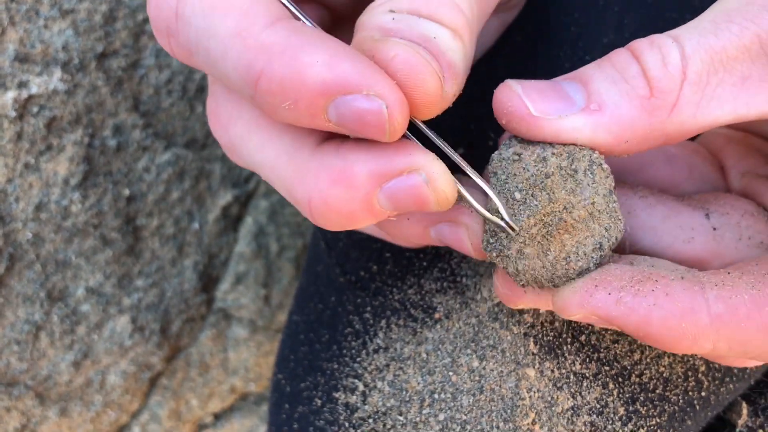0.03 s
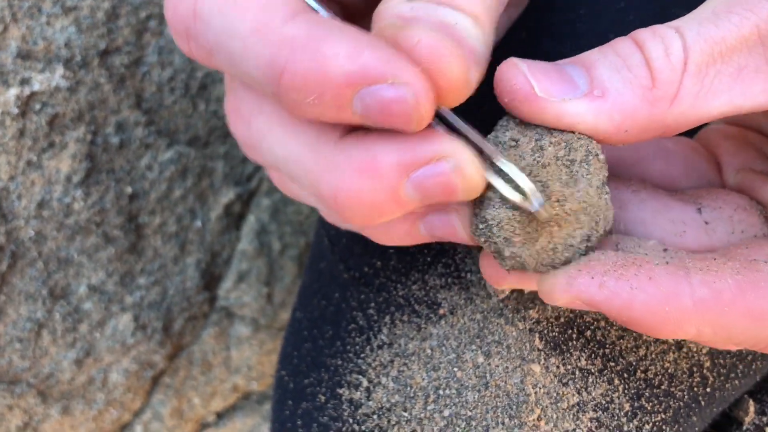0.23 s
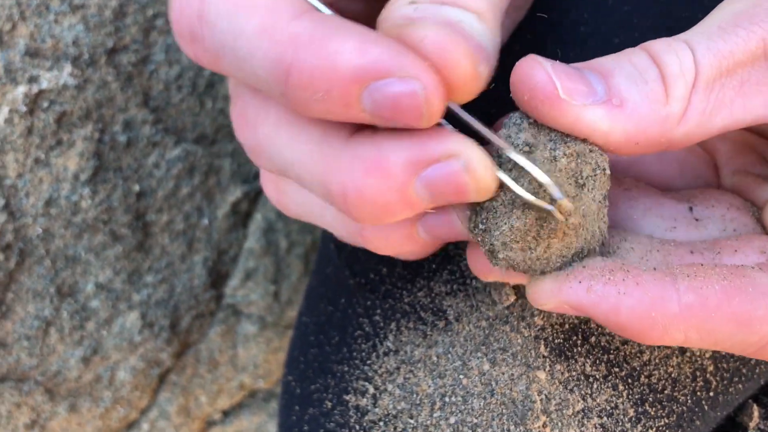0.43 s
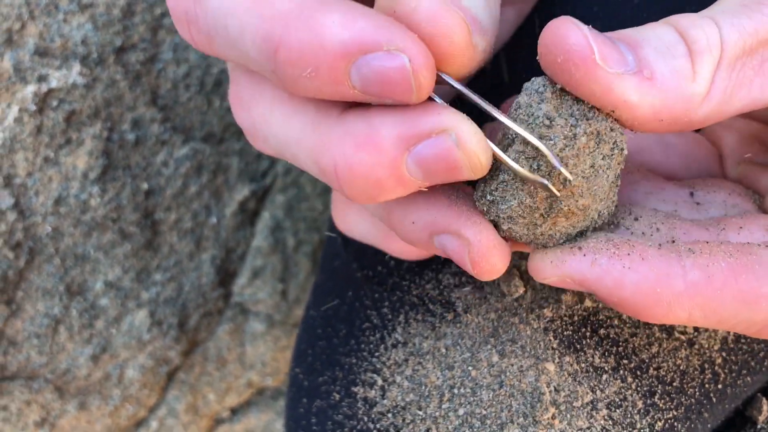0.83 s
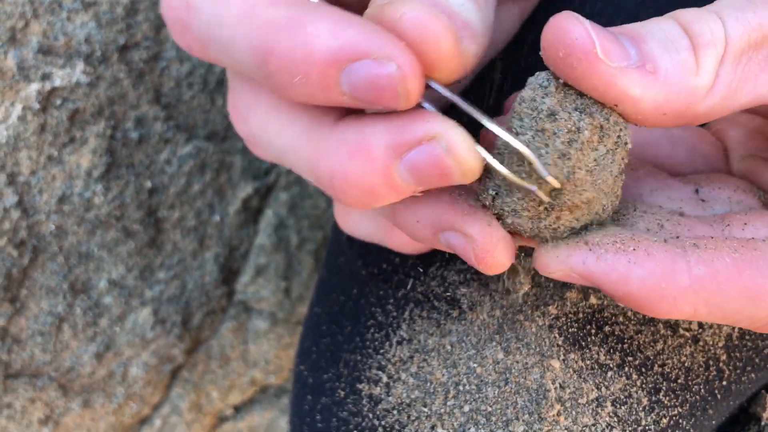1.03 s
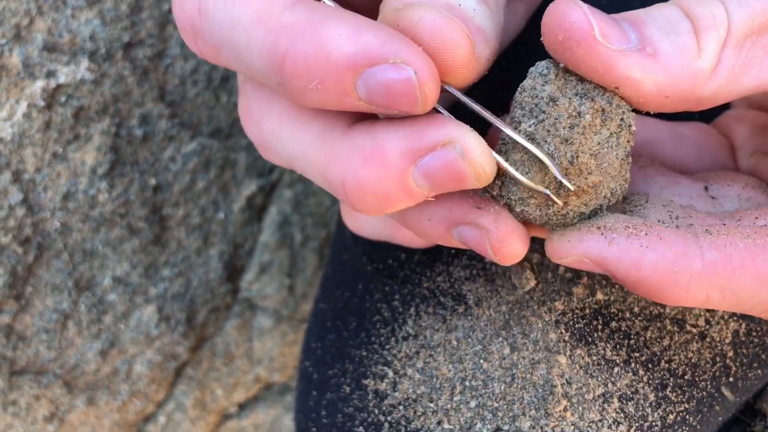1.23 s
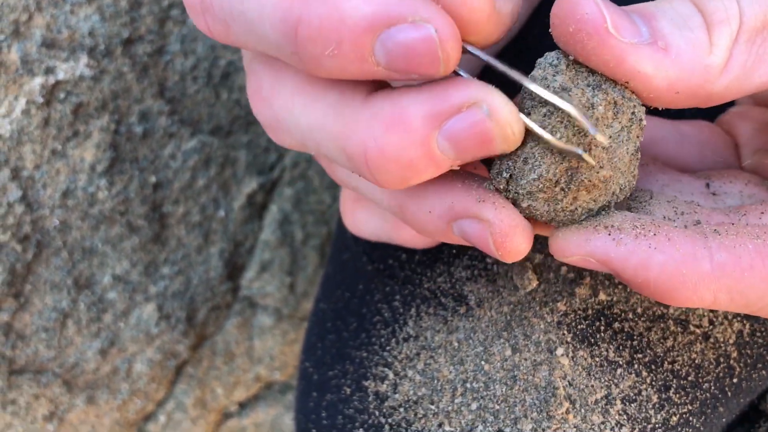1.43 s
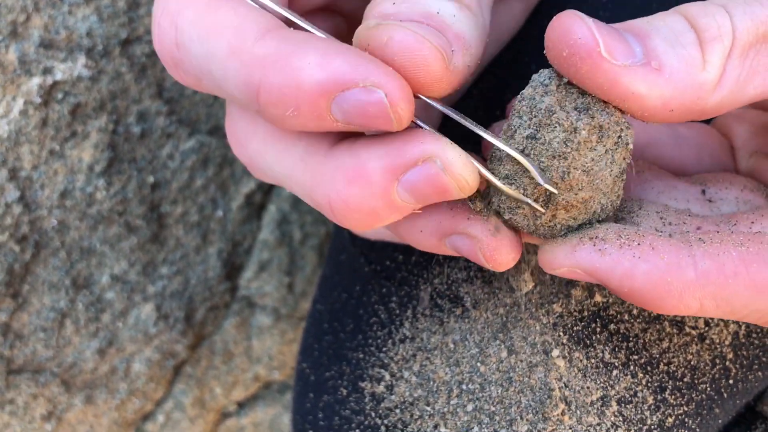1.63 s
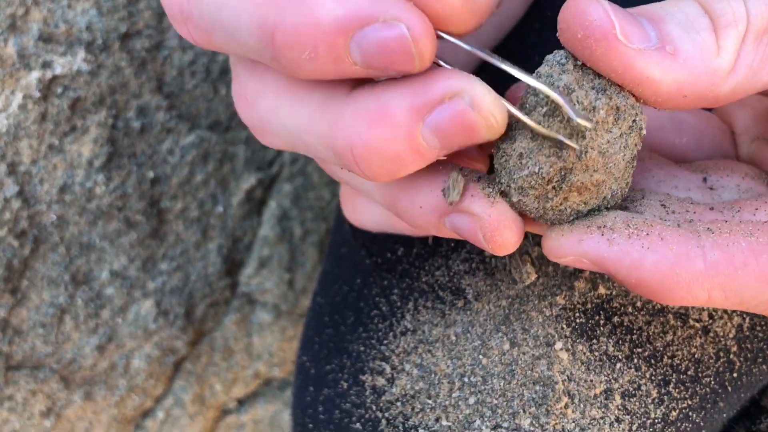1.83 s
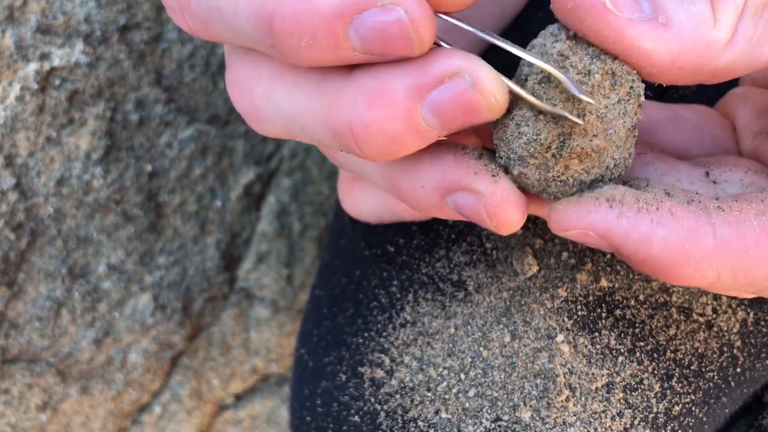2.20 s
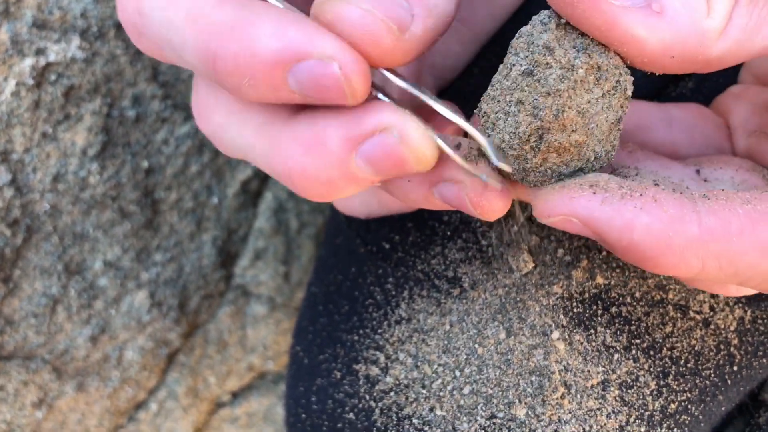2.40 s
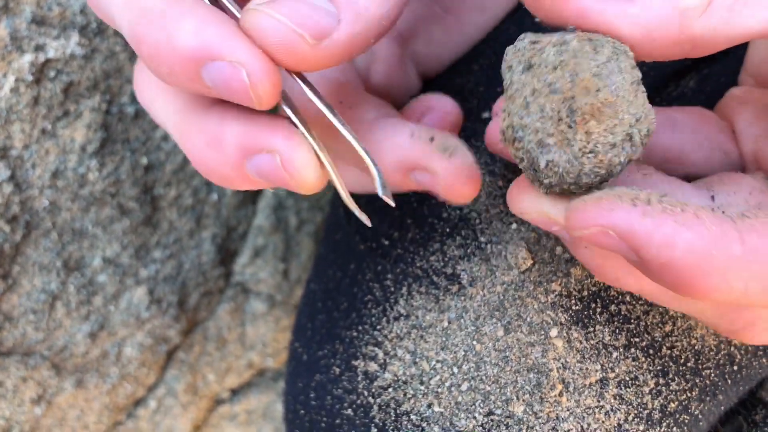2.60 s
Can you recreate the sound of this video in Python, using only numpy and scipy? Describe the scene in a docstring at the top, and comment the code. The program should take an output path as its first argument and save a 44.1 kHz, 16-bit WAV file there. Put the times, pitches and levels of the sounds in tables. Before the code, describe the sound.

Close, dry scraping of metal tweezers picking at a gritty clod outdoors. Brief crumbly strokes come irregularly, mixed with sharp little ticks of grit and a couple of light tip clicks, while low, gentle wind gusts hit the microphone.

```python
"""Steel tweezers scratch and pick at a small lump of gritty sediment, outdoors, close to the microphone.
Each short stroke crushes a run of sand grains that ring faintly in the tweezers; single grains snap off.
The tips jab the lump once and click once, and loose sand shifts between the fingers.
A light, gusty wind rumbles and buffets the microphone over a faint, distant hiss."""
import sys
import numpy as np
from scipy import signal
from scipy.fft import rfft, irfft, next_fast_len
from scipy.io import wavfile

SR = 44100
rng = np.random.default_rng(int(sys.argv[2]) if len(sys.argv) > 2 else 0)


def store_wav(level_fs):
    """Save 16-bit WAV to argv[1]."""
    pcm = np.round(np.clip(np.atleast_2d(level_fs), -1, 1) * 32767)
    wavfile.write(sys.argv[1], SR, pcm.T.astype(np.int16))


N = 121275

# eddies passing over the microphone: t/s, relative level/dB, f/Hz
WIND_EDDIES = [(.008, -39.5, 78), (0.216, -34.5, 212), (0.232, -30, 112), (0.29, -34.5, 252),
               (0.3, -25.5, 113), (.348, -39, 274), (0.383, -32.5, 290), (0.393, -25, 135),
               (0.407, -25.5, 343), (0.416, -43, 87), (.462, -40, 117), (.484, -36, 286),
               (0.506, -19.5, 243), (0.512, -18, 92), (0.53, -51, 250), (0.536, -26.5, 76),
               (.547, -29.5, 226), (0.555, -21, 90), (0.557, -38, 320), (0.573, -42, 326),
               (.601, -43, 75.4), (0.641, -36.5, 290), (0.65, -20, 90), (0.681, -33.5, 180),
               (0.704, -31.5, 214), (0.72, -31, 64.4), (0.777, -31, 80), (0.815, -30.5, 81),
               (0.862, -30, 131), (0.904, -31.5, 283), (0.926, -21, 86), (0.978, -34, 300),
               (1.008, -35, 72), (1.154, -36, 250), (1.177, -33.5, 290), (1.185, -27, 102),
               (1.208, -35.5, 199), (1.242, -35, 80.5), (1.283, -34.5, 77), (1.34, -32.5, 106.5),
               (1.543, -38.5, 181), (1.696, -30, 204), (1.715, -26, 97), (1.765, -36.5, 243),
               (1.79, -32, 161), (1.844, -34, 323), (1.855, -32.5, 113), (1.924, -27, 372),
               (1.931, -27, 84.5), (1.969, -35, 312), (1.976, -24.5, 152), (2.012, -31, 270),
               (2.019, -21, 125), (2.044, -33.5, 161), (2.076, -31.5, 119), (2.109, -31, 236),
               (2.129, -23, 82.5), (2.149, -36.5, 275), (2.172, -29, 320), (2.181, -26.5, 436),
               (2.194, -25.5, 73), (2.209, -28, 66), (2.265, -30.5, 318), (2.27, -30, 82),
               (2.3, -35.5, 327), (2.309, -34.5, 338), (2.323, -22.5, 76), (2.372, -28.5, 194),
               (2.385, -31, 67), (2.393, -37.5, 306), (2.475, -31, 240), (2.484, -26.5, 288),
               (2.511, -28, 147), (2.57, -36, 233), (2.588, -28.5, 107), (2.706, -32, 171)]
# spectrum of crushed grit: f/Hz, relative level/dB
GRIT_SPECTRUM = [(500, -3), (1100, 10.5), (1700, 6), (2600, 3), (4000, 4.5), (6200, 4), (7800, 0),
                 (9200, 1), (10500, -5), (11700, 2.5), (15500, 2)]


def from_db(db):
    """Decibels to gain."""
    return 10 ** (np.asarray(db) / 20)


def rms_one(x):
    """Scale to unit rms."""
    return x / np.sqrt(np.mean(x ** 2) + 1e-20)


def seconds():
    """Time of every sample."""
    return np.arange(N) / SR


def colour(x, spectrum):
    """Minimum-phase filter with the given spectrum and unit gain for white noise."""
    size = 2 * next_fast_len(N)
    bin_hz = np.maximum(np.arange(size // 2 + 1) * SR / size, 1)
    hz, db = np.transpose(spectrum)
    gain = rms_one(from_db(np.interp(np.log(bin_hz), np.log(hz), db)))
    cepstrum = irfft(np.log(gain))[:size // 2]
    response = np.exp(2 * rfft(cepstrum, size) - cepstrum[0])
    return irfft(rfft(x, size) * response)[:N]


def drift(hz):
    """Smooth random wander with unit rms."""
    r = np.exp(-2 * np.pi * hz / SR)
    return rms_one(signal.lfilter([1], [1, -2 * r, r * r], rng.standard_normal(N + SR))[SR:])


def ring(x, hz, t60):
    """One decaying mode, driven by x."""
    r, w = np.exp(-np.log(1000) / (t60 * SR)), 2 * np.pi * hz / SR
    return signal.lfilter([0, np.sin(w)], [1, -2 * r * np.cos(w), r * r], x + 1e-18)


def distant_air(level_db=-66.5):
    """The faint, steady hiss of the open air, far from the microphone."""
    # spectrum of the hiss: f/Hz, relative level/dB
    air_spectrum = [(100, 18.5), (400, 9), (2000, -1.5), (4000, -6), (15500, -12.5)]
    return from_db(level_db) * colour(rng.standard_normal(N), air_spectrum)


def wind_rumble(flutter_db=5, flutter_hz=13.3):
    """Moving air at the microphone, following the gusts with a quick random flutter."""
    # wind strength between buffets: t/s, level/dB
    gusts = [(0, -47), (.13, -60), (.23, -39.5), (.46, -38.5), (0.519, -24), (.61, -34), (1.33, -44.5),
             (1.42, -56.5), (1.65, -45), (1.708, -37), (2.3, -33.5), (2.66, -44.5)]
    # spectrum of wind on the microphone: f/Hz, relative level/dB
    rumble_spectrum = [(22, -30.5), (40, 6), (62, 7), (120, -2.5), (200, -13.5), (400, -35.5), (800, -65.5)]
    gust_db = np.interp(seconds(), *np.transpose(gusts)) + flutter_db * drift(flutter_hz)
    return from_db(gust_db) * colour(rng.standard_normal(N), rumble_spectrum)


def eddy_wakes(gain_db=-17.5, half_length_s=.022):
    """Each eddy breaks up at the microphone into a short flurry of smaller swirls."""
    # spectrum of the rough air in a wake: f/Hz, relative level/dB
    wake_spectrum = [(50, -14), (170, 6.5), (450, -12), (1000, -48)]
    t, power = seconds(), np.zeros(N)
    for s, db, _ in WIND_EDDIES:
        near = np.abs(t - s) < half_length_s
        swell = np.cos(np.pi / 2 * (t[near] - s) / half_length_s)
        power[near] += (from_db(db + gain_db) * swell) ** 2
    return np.sqrt(power) * colour(rng.standard_normal(N), wake_spectrum)


def eddy_buffets(gain_db=3, slowing=.4, width_cycles=.62):
    """Each eddy buffets the microphone with one pressure swing, quick at first and slower at its end; small
    ones swing quicker."""
    t, out = seconds(), np.zeros(N)
    for s, db, hz in WIND_EDDIES:
        near = np.abs(t - s) * hz < 5
        cycles = (t[near] - s) * hz
        swing = cycles - slowing * np.log(np.cosh(cycles))
        envelope = from_db(db + gain_db) / np.cosh(cycles / width_cycles) ** 3
        out[near] -= envelope * np.sin(2 * np.pi * swing)
    return out


def wind(low_cut_hz=39):
    """Wind on the microphone: rumble and wakes with the deepest bass cut, plus the buffets."""
    low_cut = signal.butter(4, low_cut_hz, "high", fs=SR, output="sos")
    return signal.sosfilt(low_cut, wind_rumble() + eddy_wakes()) + eddy_buffets()


def uneven_hiss(wander_db=2, wander_hz=90):
    """White noise whose colour shifts from grain to grain."""
    edges_hz = (0, 2600, 5500, 10500, SR)
    white, hz = rfft(rng.standard_normal(N)), np.fft.rfftfreq(N, 1 / SR)
    bands = [irfft(white * ((hz >= low) & (hz < high)), N) for low, high in zip(edges_hz, edges_hz[1:])]
    return sum(band * from_db(wander_db * drift(wander_hz)) for band in bands)


def grains(per_s, spread_db=3.6, grain_s=.00042):
    """Grains of uneven size crumble at random: a fine, soft-edged crackle; unit rms."""
    sizes = from_db(spread_db * np.minimum(rng.exponential(1, N), 3))
    cracks = sizes * (rng.random(N) < per_s / SR)
    decay = np.exp(-2 / (grain_s * SR))
    power = signal.filtfilt([1], [1, -decay], cracks ** 2 + 1e-18, padtype=None)
    return rms_one(np.sqrt(power) * uneven_hiss())


def loose_sand(level_db=-77):
    """Sand shifts faintly between the fingers."""
    return from_db(level_db) * colour(grains(per_s=84), GRIT_SPECTRUM)


def tip_click(at_s=2.2238, touch_db=-46):
    """The steel tips touch lightly and ring for a few milliseconds."""
    # modes of the tips: f/Hz, relative level/dB, t60/s
    tip_modes = [(5670, -1, 0.0074), (7160, -1, 0.0054), (12800, -5, 0.003), (15100, -7, 0.0036)]
    touch = from_db(touch_db) * (np.arange(N) == int(at_s * SR))
    return sum(from_db(db) * ring(touch, hz, t60) for hz, db, t60 in tip_modes)


def jab(at_s=.8497, impulse_db=-17.5, dull_hz=600):
    """The tip jabs once: a dry click, dulled by the soft lump."""
    impulse = from_db(impulse_db) * (np.arange(N) == int(at_s * SR))
    return signal.lfilter(*signal.butter(1, dull_hz, fs=SR), impulse)


def brighten(x, db, shelf_hz=6000):
    """Treble shelf: a harder contact sounds brighter."""
    treble = signal.lfilter(*signal.butter(1, shelf_hz, "high", fs=SR), x)
    return x + (from_db(db) - 1) * treble


def snapping(gain_db=-7.5, rise_decay_s=.0005, q=1.4, broad_share=.25):
    """Larger grains break loose with one sharp tick each, coloured around a pitch of its own; the tick at 0.854
    s is the bright edge of the jab."""
    # grains snapping off, and at 0.854 s the bright edge of the jab: t/s, relative level/dB, f/Hz
    snaps = [(0.051, -52, 3420), (0.0833, -39, 11900), (0.091, -53, 4400), (0.352, -42.5, 5040),
             (.3588, -43, 6070), (.4203, -39, 4560), (0.705, -42, 13000), (.854, -43.5, 13000),
             (0.9244, -52, 14900), (0.988, -43, 9000), (1.227, -45, 7000), (1.326, -61, 2980),
             (1.459, -51, 5050), (1.661, -35.5, 6940), (1.686, -46.5, 3540), (1.781, -59, 6160),
             (2.022, -47, 4260), (2.1, -54, 6000), (2.381, -31, 12500), (2.421, -46, 4500),
             (2.556, -49.5, 3130), (2.653, -40, 14500)]
    t, out = seconds(), np.zeros(N)
    for s, db, hz in snaps:
        near = np.abs(t - s) < 10 * rise_decay_s
        envelope = np.exp(-np.abs(t[near] - s) / rise_decay_s)
        burst = envelope * rng.choice([-1, 1], N)[near]
        tick = signal.lfilter(*signal.iirpeak(hz, q, fs=SR), burst) + broad_share * burst
        out[near] += from_db(db + gain_db) * burst.std() * rms_one(tick)
    return out


def scraping(gain_db=-1, attack_s=.0027, release_s=.0044, rub_share=.22):
    """Each stroke bites, drags through the grains with some smooth rubbing, and lets go."""
    # drags of the tips over the lump: t/s, length/s, relative level/dB, treble shelf/dB
    strokes = [(0.0, 0.05, -62, 1.5), (0.074, 0.018, -60.5, 1.5), (0.098, 0.023, -64, 2),
               (0.197, 0.069, -63, -1), (0.333, 0.072, -62, -4), (0.363, 0.018, -58, 5),
               (0.412, 0.0027, -56.5, 7), (0.45, 0.061, -65.5, -11), (0.515, 0.052, -62.5, -11),
               (0.607, 0.013, -57.5, -3.5), (0.637, 0.0092, -56, -6), (0.755, 0.018, -57.5, -5.5),
               (0.774, 0.048, -68.5, -1), (0.965, 0.084, -63, 2), (0.99, 0.0096, -51.5, 2),
               (1.012, 0.0081, -56.5, 11.5), (1.078, 0.12, -68, -5), (1.192, 0.037, -62, -2.5),
               (1.267, 0.047, -61.5, -3.5), (1.323, 0.0084, -56.5, 4.5), (1.486, .052, -62, 1),
               (1.546, 0.015, -61.5, -1.5), (1.591, 0.038, -69, 5), (1.652, 0.023, -54, 4),
               (1.939, 0.1, -66, -10), (1.951, 0.026, -65.5, 9), (1.98, 0.015, -57, 5.5),
               (2.373, 0.058, -67.5, 5), (2.376, 0.0055, -55, 12.5), (2.402, 0.051, -68, -2.5),
               (2.412, 0.011, -61.5, 7.5), (2.465, 0.0061, -63, 3), (2.499, 0.014, -64.5, 1),
               (2.61, 0.08, -73, 9)]
    t, power, weighted_treble = seconds(), np.full(N, 1e-18), 0
    for start, length, db, treble_db in strokes:
        bite = np.clip((t - start) / attack_s, 0, 1)
        release = np.exp(-np.maximum(t - start - length, 0) / release_s)
        stroke_power = (from_db(db + gain_db) * bite * release) ** 2
        power += stroke_power
        weighted_treble += stroke_power * treble_db
    crunch = rms_one(grains(per_s=1400) + rub_share * rng.standard_normal(N))
    return brighten(np.sqrt(power) * crunch, weighted_treble / power)


def tweezers(contact):
    """The crunch reaches the microphone directly and through the finger-damped steel arms."""
    # how strongly the arms ring as the grip changes: t/s, relative level/dB
    grip = [(.24, -5), (.37, 0.5), (.55, -3.5), (1.02, 2), (1.25, -10.5), (1.66, 2.5), (2.0, 0.5),
            (2.6, 0.5)]
    # modes of the arms: f/Hz, relative level/dB, t60/s
    arm_modes = [(1250, -31.5, 0.046), (2104, -43.5, 0.09), (3424, -32, 0.019), (4140, -45.5, 0.0074),
                 (4350, -28, 0.0083), (4580, -31.5, 0.02), (13400, -29.5, 0.0028)]
    drive = contact * from_db(np.interp(seconds(), *np.transpose(grip)))
    arms = sum(from_db(db) * ring(drive, hz, t60) for hz, db, t60 in arm_modes)
    return colour(contact, GRIT_SPECTRUM) + arms


def scene():
    """One microphone outdoors: tweezers up close, over loose sand, distant air and wind."""
    background = loose_sand() + distant_air() + wind()
    picking = tweezers(scraping() + snapping()) + tip_click() + jab()
    return (background + picking)[None]


def record(dry, cutoff_hz=15750):
    """A steep low-pass takes the very top off the microphone signal."""
    return signal.sosfilt(signal.ellip(10, .2, 80, cutoff_hz, fs=SR, output="sos"), dry)


dry = scene()
out = record(dry)
store_wav(out)
```